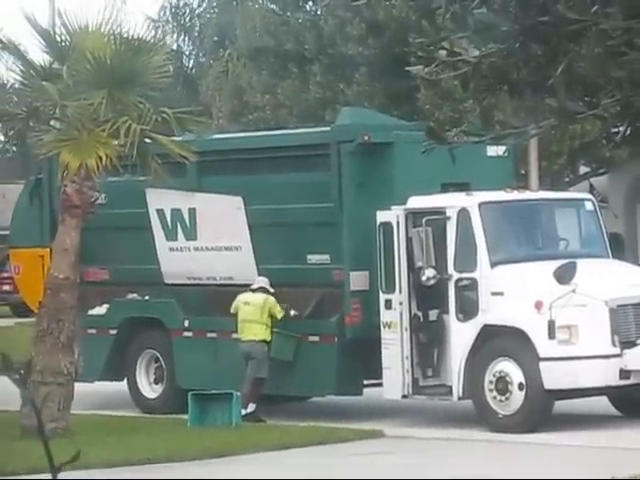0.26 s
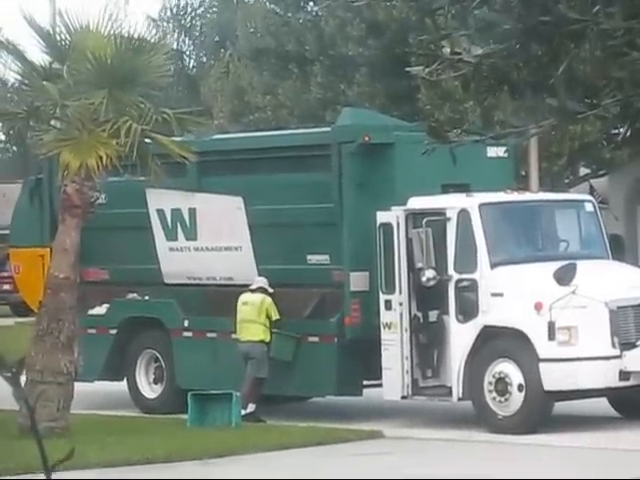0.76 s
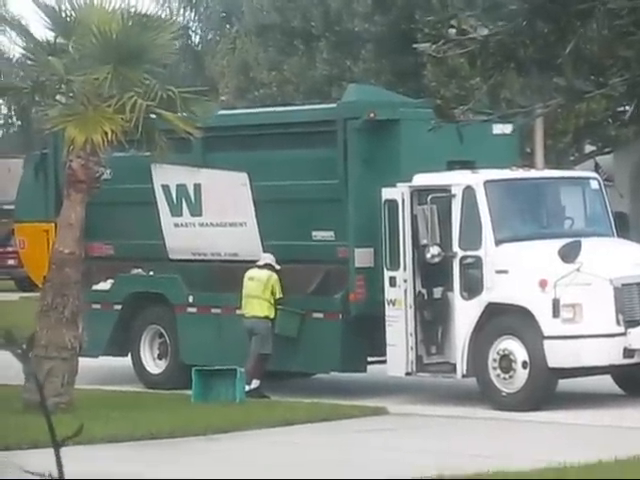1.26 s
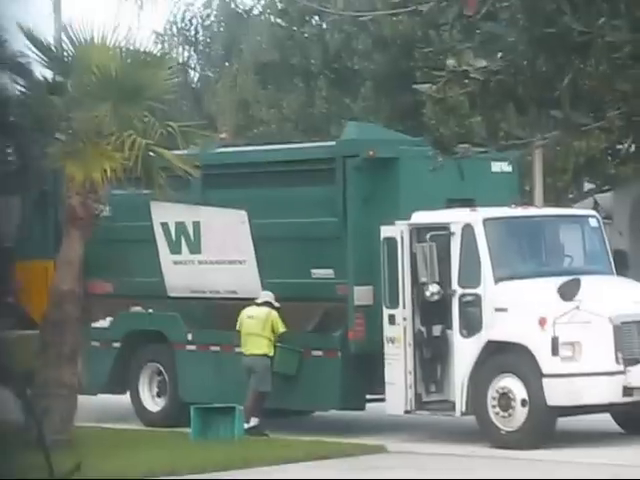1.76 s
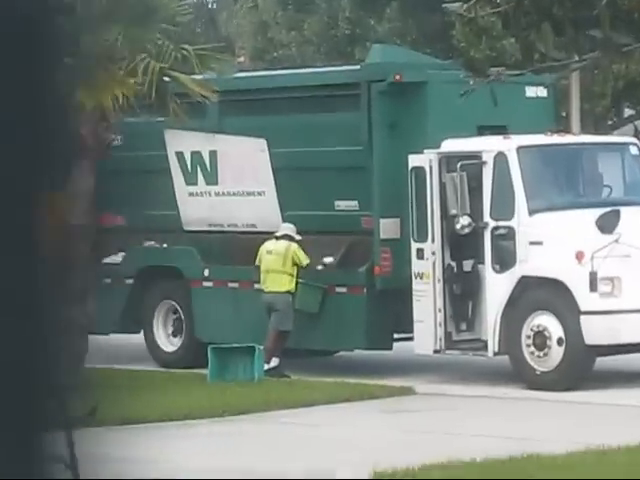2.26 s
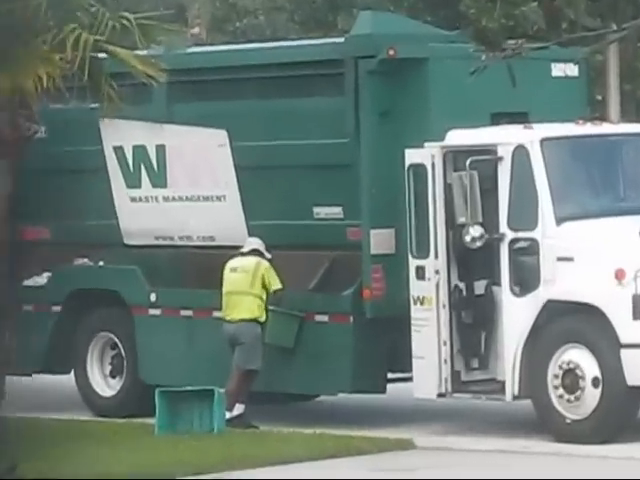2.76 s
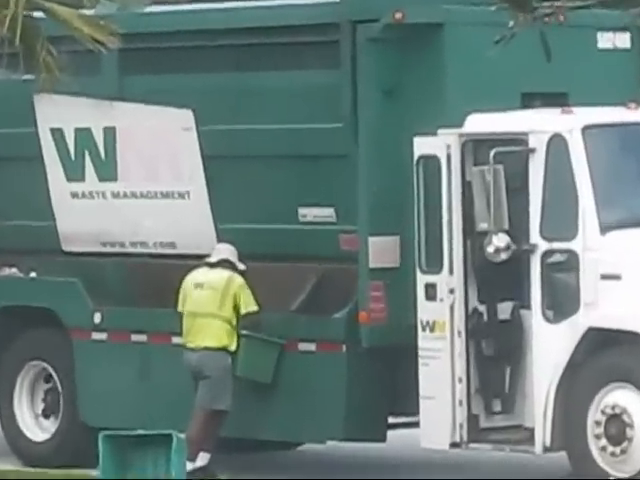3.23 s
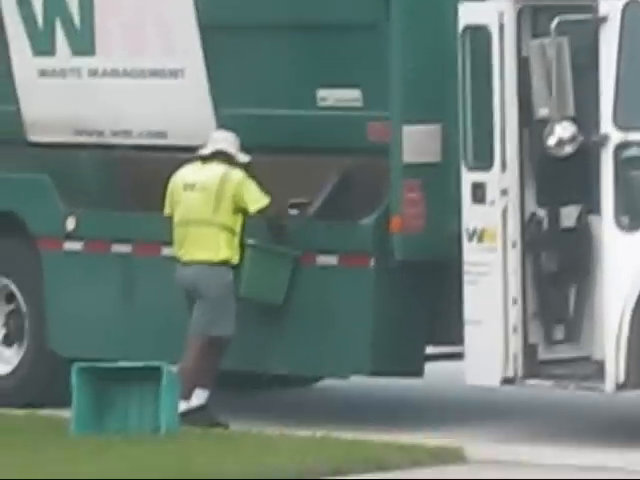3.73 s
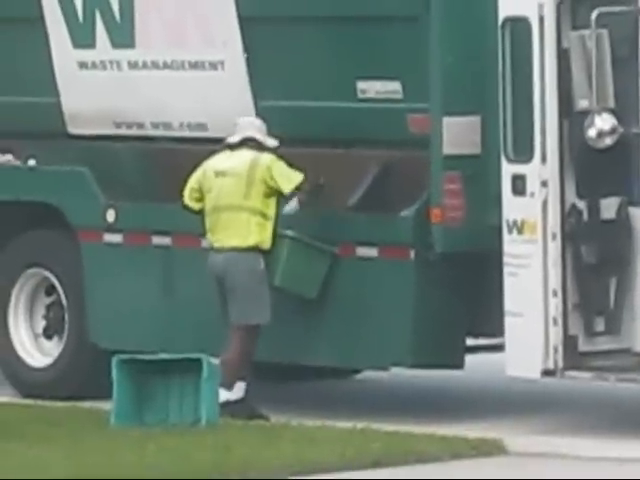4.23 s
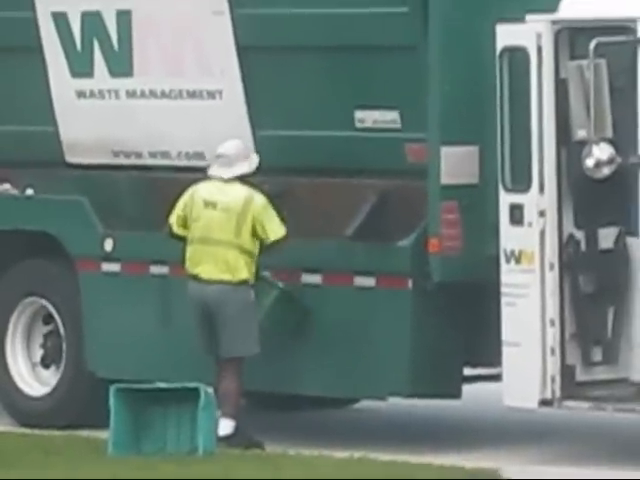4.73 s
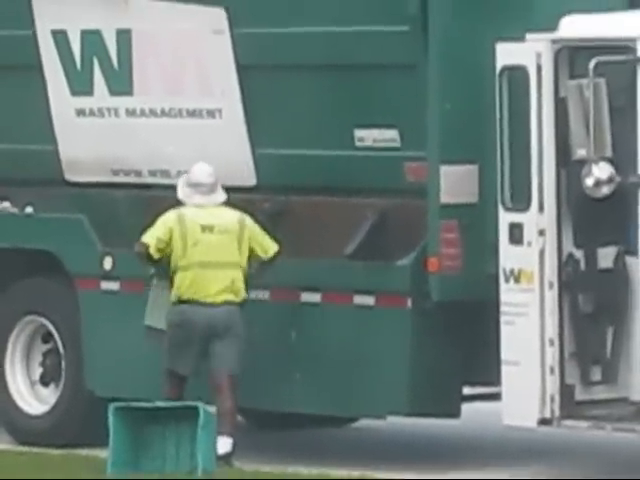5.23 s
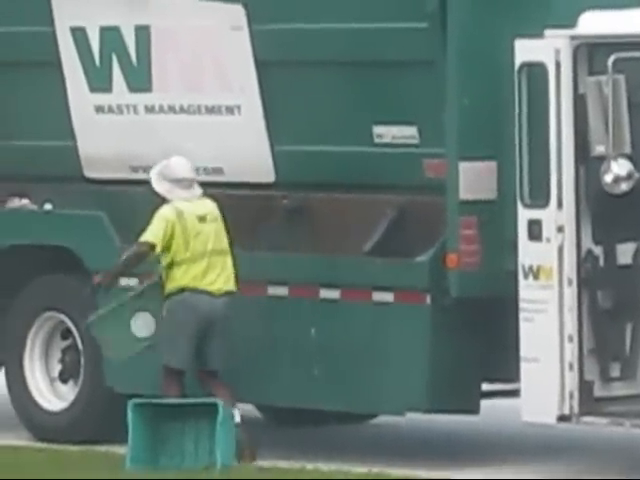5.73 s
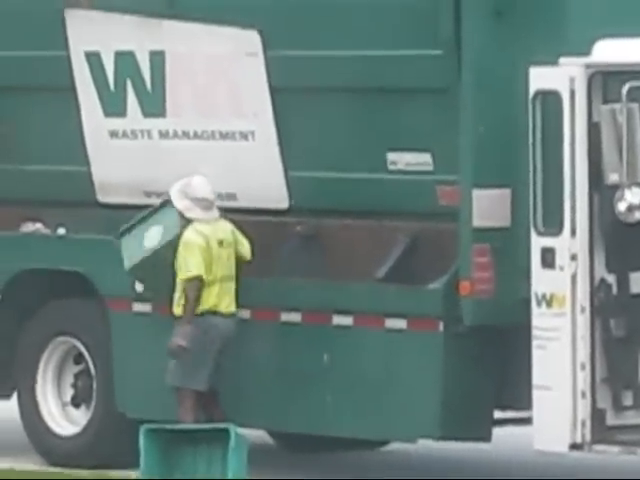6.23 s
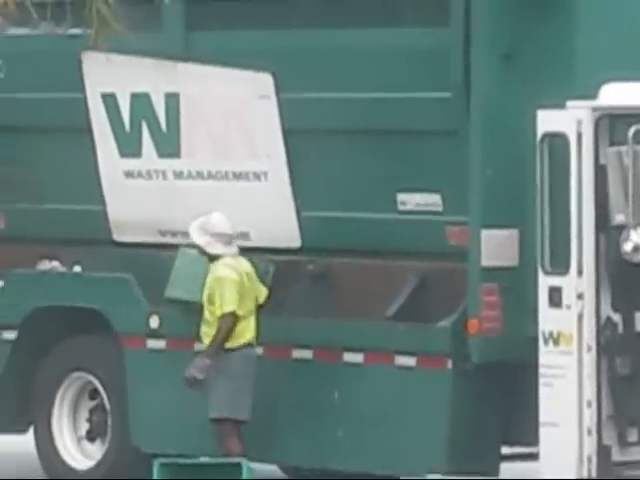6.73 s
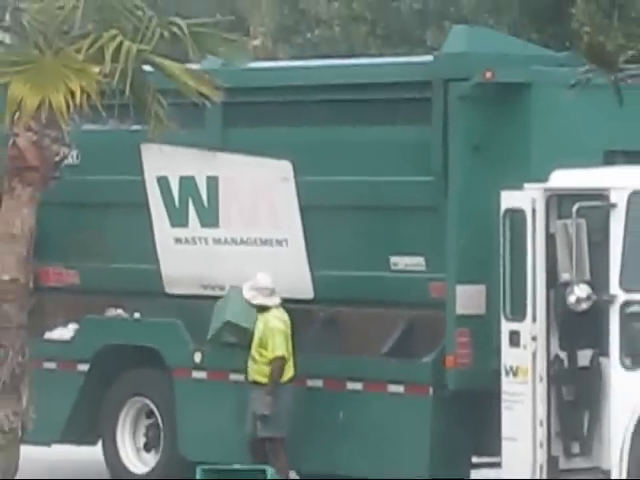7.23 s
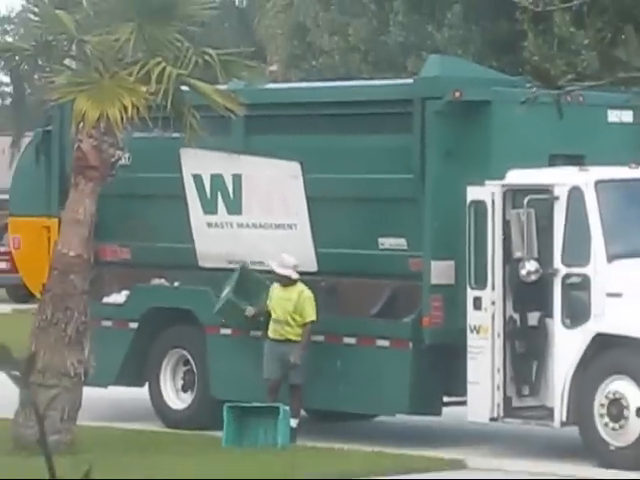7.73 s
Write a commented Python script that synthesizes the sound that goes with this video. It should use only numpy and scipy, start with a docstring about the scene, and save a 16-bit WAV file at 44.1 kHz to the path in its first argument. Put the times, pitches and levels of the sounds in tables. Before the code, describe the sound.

Outdoors across a residential street, a diesel truck idles steadily with a low throb and faint whine. Batches of glass bottles and cans crash into its steel hopper, ringing brightly over metallic clangs and dull thuds, with sparse echoes off hopper walls and houses. Gaps leave the engine alone. Very close, loud dry plastic clicks from the hand-held recorder interrupt, some overloading. Two lone thin glass clinks come near the end.

```python
"""Handfuls of bottles and cans land in the steel hopper of a diesel truck that idles across the street.
Each piece of glass rings with decaying partials; noise blows ring the steel and rumble the load beneath.
The engine is a firing tone, noise booms and whines, and a throbbing clatter; sparse echoes follow the load.
Close to the microphone, the plastic shell of the hand-held recorder clicks in short bursts of modes and noise."""
import sys
import numpy as np
from scipy import signal
from scipy.fft import rfft, irfft, next_fast_len
from scipy.io import wavfile
from scipy.ndimage import uniform_filter1d

SR = 44100
rng = np.random.default_rng(int(sys.argv[2]) if len(sys.argv) > 2 else 0)


def transcribe(u):
    """Save the signal u as a 16-bit wav file named by the first command-line argument.

    u: samples, shape (n,) or (channels, n), limited to [-1, 1]; the rate is SR.
    q: integer samples, one column per channel.
    """
    v = np.clip(np.atleast_2d(u).T, -1, 1)
    q = np.round(v * 32767).astype(np.int16)
    wavfile.write(sys.argv[1], SR, q)


N = 352182  # samples, just under 8 s

# hopper steel between its modes: (f/Hz, level/dB per Hz)
WALL = [(250, -23.5), (500, -6), (900, 3), (2000, 5), (2600, -3), (3600, -17.5), (4500, -19), (7000, -12.5)]


def gain_of(db):
    """Amplitude factor of a level in dB."""
    return 10 ** (np.asarray(db) / 20)


def evened(x):
    """Scales x to rms 1."""
    return x / np.sqrt(np.mean(abs(x) ** 2) + 1e-20)


def add(mix, s, sound):
    """Lays a sound into the mix, starting at s seconds."""
    part = mix[round(s * SR):][:len(sound)]
    part += sound[:len(part)]


def coloured(x, points):
    """Filters x by a curve of (f/Hz, level/dB) points on a log frequency axis; rms 1."""
    f, db = np.transpose(points)
    size = next_fast_len(len(x))
    hz = np.fft.rfftfreq(size, 1 / SR)
    curve_db = np.interp(np.log(hz + 1), np.log(f), db, -90, -90)
    return evened(irfft(rfft(x, size) * gain_of(curve_db), size)[:len(x)])


def resonate(x, hz, width):
    """One two-pole resonance, its width in Hz; rms 1."""
    r = np.exp(-np.pi * width / SR)
    return evened(signal.lfilter([1, 0, -r], [1, -2 * r * np.cos(2 * np.pi * hz / SR), r * r], x))


def drift(n, seconds):
    """Slow chance: noise averaged twice over the given time; rms 1."""
    size = max(round(seconds * SR), 2)
    once = uniform_filter1d(rng.standard_normal(n), size)
    return evened(uniform_filter1d(once, size))


def engine():
    """Idling diesel: firing tone with its octave, fuzzy booms and whines, clatter throbbing with the firings."""
    # pipe and cab booms: (f/Hz, width/Hz, level/dB)
    booms = [(124.2, 12.4, -50.5), (187, 20, -53.5), (232.8, 21, -55)]
    # block and pump whines: (f/Hz, width/Hz, level/dB)
    whines = [(762.3, 22, -57), (942, 9.2, -66), (1021, 16, -54.5), (1251, 23, -54), (1358, 7.5, -54.5),
              (1434, 16, -57), (1497, 15, -53), (1603, 3.5, -63.5), (1778, 12.5, -55.5), (2453, 80, -54)]
    # clatter of engine and street: (f/Hz, level/dB per Hz)
    clatter_curve = [(20, -28), (60, -15), (85, -23), (105, -3), (240, -14.5), (400, -16), (750, -11),
                     (1450, -10.5), (2740, -13.5), (4200, -22.5), (6370, -29), (8500, -37), (13700, -35),
                     (15700, -42), (16100, -60)]
    firing_hz, firing_db, clatter_db = 70.2, -43.8, -40  # mean rate and levels, each wavering below

    firings = np.cumsum(firing_hz + .6 * drift(N, .08)) / SR
    octave = gain_of(-9.0) * np.sin(4 * np.pi * firings + 1.13)
    tone_level = np.sqrt(2) * gain_of(firing_db + 1.1 * drift(N, 0.11))
    tone = tone_level * (np.sin(2 * np.pi * firings) + octave)

    uneven = gain_of(2.4 * rng.standard_normal(N // 400))[firings.astype(int)]  # no two firings are alike
    throb = 1 + .5 * uneven * np.exp(-(firings % 1) / 0.52)
    clatter = coloured(throb * rng.standard_normal(N), clatter_curve) * gain_of(clatter_db)
    clatter = clatter * gain_of(.8 * drift(N, .07))  # it wavers a little

    noise = rng.standard_normal(N)
    hum = sum(gain_of(db) * resonate(resonate(noise, f, width), f, width) for f, width, db in booms + whines)
    return tone + clatter + hum


def knock(db, build, piece):
    """A crack at first touch; partials swell as the piece bounces, then die; longer bounces waver more."""
    # partials heard with each piece of glass, with faint high ones above 8 kHz, by name:
    # (f/Hz, level/dB, t60/s)
    glass = { "jar": [(2470, -12, 0.14), (2574, 0.5, 0.14), (2700, -6, .15), (2800, -9, .1),
             (3110, -8, .06), (3680, -15, .15), (4170, -15, .07), (5800, -16, .2)],
             "wine bottle": [(2498, 0, .32), (2440, -6, .3), (3413, 2, .2), (3251, -10, .2),
             (3704, -12, .28), (3984, -9, .3), (4651, -3, .3), (4712, -6, .22), (5227, -16, .3),
             (6228, -17, .35), (6966, -18, .25), (8969, -30, .3), (10570, -28, .3)],
             "green bottle": [(2348, -4, .3), (2390, -8, .2), (2018, -12, .1), (2580, -13, 0.18),
             (4730, -12, .05), (5600, -12, .05)], "flask": [(3138, 0, .35), (6411, -11, .4)],
             "small bottle": [(3466, 0, .25), (3552, -10, .2), (2578, -6, .2), (4139, -12, .2),
             (4650, -12, .2), (5614, -9, .25), (6955, -14, .2)], "beer bottle": [(2379, 0, .18),
             (2455, -6, .22), (3984, -22, .2), (4910, -24, .2), (5943, -12, .33), (6433, -23, .3),
             (8950, -33, .25), (12300, -36, .3), (13620, -34, .5)], "wide jar": [(3316, 0, .22),
             (3407, -1, .22), (4139, -10, .2), (4543, -10, .25), (4750, -12, .15), (5657, -14, .25),
             (11500, -24, .2), (12500, -26, .2)], "juice bottle": [(2455, 0, .35), (2530, -7, .3),
             (3348, -10, .35), (3682, -16, .3), (3860, -20, .3), (4910, -24, .3), (5082, -14, .25),
             (6686, -22, .25), (9205, -26, .25), (10900, -20, .22)], "square bottle": [(2298, -1, .3),
             (2374, 0, .3), (2492, -1, .3), (3682, -6, .3), (5948, -13, .2), (6093, -13, .25),
             (10060, -22, 1.), (14200, -28, .4)], "tall bottle": [(2462, 0, .23), (2496, -6, .25),
             (3192, -1, .38), (3261, -12, .3), (4861, -20, .3), (5200, -20, .35), (5437, -24, .3),
             (5658, -16, .3), (5739, -21, .3), (6227, -10, .45), (6388, -11, .45)],
             "squat bottle": [(2507, -1.5, 0.25), (2405, -11.5, .3), (2610, -7, .3), (3280, -13, .2)],
             "soda bottle": [(2584, 0, .26), (5615, -32, .15)], "phial": [(3343, 0, .18)],
             "thin bottle": [(3327, 0, 0.17), (4002, -9.5, 0.15), (4800, -8, 0.061), (5580, -1.5, 0.0097),
             (6700, -8, 0.014)]}
    t = np.arange(SR // 2) / SR
    rough = .41 * (1 - np.exp(-(build / .003) ** 2))
    ring = 0
    for hz, partial_db, t60 in glass[piece]:
        wander = drift(len(t), .007) + 1j * drift(len(t), .007)  # in both level and phase
        waver = (1 + rough * wander) / np.sqrt(1 + 2 * rough ** 2)
        ring = ring + gain_of(partial_db - 60 * t / t60) * (waver * np.exp(2j * np.pi * hz * t)).imag
    swelling = 1 - np.exp(-t / build)
    fade = np.minimum(20 * (t[-1] - t), 1)  # over the last 50 ms
    crack = gain_of(-14.5 - 60 * t / 0.046) * coloured(rng.standard_normal(len(t)), WALL)
    on_steel = piece != "thin bottle"  # only pieces that land on the steel crack
    return gain_of(db) * (ring * swelling * fade + on_steel * crack)


def street(x):
    """Sparse echoes of either sign from the hopper walls, road and house fronts."""
    size, t60 = SR // 2, 0.58  # samples, s
    taps = rng.choice([-1., 1.], size) * (rng.random(size) < 2000 / SR)  # some 2000 echoes per second
    first = np.arange(size) > 300  # samples, about 7 ms
    taps = taps * gain_of(-60 * np.arange(size) / SR / t60) * first
    return signal.fftconvolve(x, taps / np.linalg.norm(taps))[:N]


def swell(axis, lingers):
    """Level of one layer: each landing builds up, then dies away; landings add in power."""
    # part of a handful lands or slides: (t/s, build-up/s, t60/s before the layer's lingers factor,
    # blows on steel level/dB, fizz of shards level/dB, jostling glass level/dB)
    landings = [(.336, 0.02, 0.41, -31.5, -46, -56), (0.574, 0.0067, 0.67, -27, -39.5, -55),
                (0.599, 0.019, 0.63, -20, -32, -22), (.660, 0.011, 0.42, -19.5, -25, -22.5),
                (.700, .015, 0.42, -28.5, -40, -35), (.760, .03, 1, -31, -42, -34),
                (.850, .01, 0.54, -33, -42, -29.5), (0.941, 0.0067, 0.75, -33, -31.5, -22.5),
                (.965, 0.019, 0.6, -30, -44, -40), (1.240, 0.019, 0.66, -36.5, -34.5, -36),
                (2.424, 0.013, 1, -33, -53, -58), (2.480, 0.038, 0.55, -33.5, -59, -50),
                (2.535, 0.018, 0.45, -28, -54, -38), (2.648, 0.011, 0.97, -30.5, -32, -26),
                (2.680, 0.014, 0.42, -25.5, -25.5, -28), (2.705, 0.011, 0.46, -24.5, -26.5, -26),
                (2.926, .03, 0.37, -46, -37, -32), (3.918, 0.018, 0.44, -32.5, -46.5, -54),
                (3.978, 0.0093, 0.65, -26.5, -57, -33), (4.040, 0.016, 0.2, -26.5, -65, -55),
                (4.122, 0.027, 0.47, -29.5, -29, -44), (4.170, 0.031, 1, -30.5, -33.5, -22),
                (4.942, 0.011, 0.54, -27, -37.5, -35), (4.974, 0.015, 0.55, -27, -31.5, -21.5),
                (5.020, 0.013, 0.42, -29.5, -28.5, -42), (5.255, 0.0075, .8, -50, -44, -32),
                (5.360, 0.024, 0.4, -35.5, -43, -47), (5.412, 0.0078, .6, -39, -55, -36),
                (5.480, 0.0085, 0.21, -41, -60, -44), (5.555, 0.01, .1, -39, -65, -58)]
    power, t = np.zeros(N), np.arange(SR) / SR
    for row in landings:
        s, build, t60 = row[:3]
        decay = gain_of(row[axis] - 60 * np.maximum(t - build, 0) / (t60 * lingers))
        shape = np.minimum(t / build, 1) * decay
        add(power, s, shape ** 2)
    return np.sqrt(power)


def jostle(n):
    """Many small pieces of glass touch at random; each rings briefly at a pitch of its own."""
    # where the heaped glass rings: (f/Hz, spread to either side/Hz, level/dB)
    heap = [(2470, 150, -0.5), (3315, 320, -5), (4770, 454, -17.5), (5930, 552, -12.5), (10900, 1600, -38)]
    t, out = np.arange(2048) / SR, np.zeros(n)
    for centre_hz, spread_hz, db in heap:
        for pitch, length in rng.random((6, 2)):  # six pieces to a band
            force = gain_of(3 * np.minimum(rng.exponential(1, n), 3))
            touches = force * (rng.random(n) < 60 / SR)  # some 60 per second
            hz = centre_hz + spread_hz * (2 * pitch - 1)
            t60 = .04 + .06 * length
            ring = gain_of(db - 60 * t / t60) * np.sin(2 * np.pi * hz * t)
            out += signal.oaconvolve(touches, ring)[:n]
    return evened(out)


def load():
    """A dense hail of blows rings the steel; the load thuds, shards fizz and the heap jostles."""
    # modes of the hopper: (f/Hz, width/Hz, level/dB)
    hopper = [(650, 53, 3), (753, 40, 4), (966, 15, 2), (986.7, 6.1, 2), (1180, 180, 1), (1320, 42, -0.5),
              (1515, 50, -8), (1855, 30, -1.5), (2000, 44, -12.5)]
    # fizz of shards: (f/Hz, level/dB per Hz)
    shards = [(2500, 16), (3500, 4.5), (6000, 4.5), (7300, -2.5), (9000, -1.5), (11000, -1.5),
              (13000, -6.5), (16000, -9.5)]
    force = gain_of(2.0 * np.minimum(rng.exponential(1, N), 3))
    blows = force * (rng.random(N) < 400 / SR)  # some 400 per second
    hail = evened(signal.lfilter([1], [1, -.99], blows)) + 1.1  # each blow leaves a short wake
    drive = hail * rng.standard_normal(N)

    modes = evened(sum(gain_of(db) * resonate(drive, f, width) for f, width, db in hopper))
    steel = evened(coloured(drive, WALL) + 1.1 * modes)
    thud = gain_of(-10.5) * coloured(drive, [(60, -6), (100, -1), (200, 1.5), (400, -13)])
    fizz = coloured(drive, shards)
    return (swell(axis=3, lingers=0.99) * steel + swell(axis=3, lingers=1.09) * thud
            + swell(axis=4, lingers=0.9) * fizz + swell(axis=5, lingers=0.74) * jostle(N))


def click(db, hz, low_db, crack_db, tick_db):
    """A snap in the plastic: a few cycles of the shell's modes, a broad crack and a bright tick."""
    # low modes of the shell: (f/Hz, level/dB, t60/s)
    shell = [(1477, -0.5, 0.012), (2110, -0.5, 0.0079)]
    t = np.arange(1200) / SR
    noise = rng.standard_normal(len(t))
    ring = gain_of(-60 * t * hz / 18) * np.sin(2 * np.pi * hz * t)  # dies by 60 dB in 18 cycles
    rise = (1 - np.exp(-t / 0.00032)) ** 2  # the snap takes a cycle or two to build
    low = sum(gain_of(low_db + d - 60 * t / t60) * np.sin(2 * np.pi * f * t) for f, d, t60 in shell)
    low = low * (1 - np.exp(-t / 0.00077))
    broad = coloured(noise, [(300, -18), (1200, 3.0), (2200, 4.5), (5200, -1.0), (7500, -14)])
    crack = gain_of(crack_db - 60 * t / 0.0084) * broad
    bright = coloured(noise, [(7500, -15), (8500, 0.5), (14000, -0.5), (16500, -10)])
    tick = gain_of(tick_db - 60 * t / 0.0082) * bright
    return gain_of(db) * rise * (ring + low + crack + tick)


def scene():
    """The truck and its load across the street, with echoes; the clicks and one thin bottle without."""
    # knocks of glass: (t/s, level/dB, time constant of the build-up/s, piece)
    knocks = [(.03, -38.5, 0.0054, "square bottle"), (.19, -28.5, 0.0017, "phial"),
              (0.434, -34, 0.018, "squat bottle"), (0.576, -30, .001, "jar"), (.610, -18, 0.0012, "jar"),
              (0.638, -14, .006, "jar"), (0.668, -17.5, .004, "jar"), (0.699, -34, .004, "jar"),
              (.766, -26, .004, "small bottle"), (0.904, -22, 0.011, "squat bottle"),
              (.945, -16.5, 0.0018, "squat bottle"), (.950, -32, .002, "wine bottle"),
              (0.976, -18.5, 0.0032, "wine bottle"), (1.085, -31, 0.0028, "flask"),
              (1.249, -26, .004, "small bottle"), (1.321, -21.5, 0.005, "green bottle"),
              (2.47, -30, 0.0089, "squat bottle"), (2.54, -38, 0.0037, "small bottle"),
              (2.651, -29, 0.0015, "wide jar"), (2.686, -12.5, 0.0069, "green bottle"),
              (2.689, -19, 0.0063, "wide jar"), (2.715, -18.5, 0.0058, "wide jar"),
              (2.719, -28, .006, "squat bottle"), (2.83, -32, .01, "wide jar"),
              (2.929, -16.5, .002, "beer bottle"), (2.956, -22, 0.005, "beer bottle"),
              (4.131, -24, 0.0033, "squat bottle"), (4.145, -11, 0.014, "juice bottle"),
              (4.165, -19, 0.0086, "juice bottle"), (4.19, -22, .01, "juice bottle"),
              (4.20, -27, .01, "wide jar"), (4.215, -21, 0.0051, "juice bottle"),
              (4.259, -27.5, .005, "square bottle"), (4.31, -34, 0.0081, "square bottle"),
              (4.38, -32.5, 0.0084, "square bottle"), (4.451, -39, 0.011, "square bottle"),
              (4.980, -23, 0.0008, "squat bottle"), (4.987, -15, 0.0046, "tall bottle"),
              (5.03, -16.5, 0.0064, "tall bottle"), (5.050, -23.5, 0.0078, "tall bottle"),
              (5.10, -20.5, 0.0045, "squat bottle"), (5.142, -23, 0.0054, "squat bottle"),
              (5.262, -12.5, .0012, "soda bottle"), (5.354, -41, .004, "soda bottle"),
              (5.415, -21, 0.00048, "squat bottle"), (5.48, -33, .005, "squat bottle"),
              (6.3157, -18.5, 0.00035, "thin bottle"), (6.9696, -22, 0.0004, "thin bottle")]
    # clicks of the shell: (t/s, level/dB, ring f/Hz, then against that level:
    # low modes level/dB, broad crack level/dB, bright tick level/dB)
    clicks = [(0.784, 0.5, 3100, -15, -20, -33), (0.8131, 8, 2760, -10.5, -8.5, -21),
              (.8300, 2, 3030, -19, -5, -22), (.8345, -0.5, 2400, -10, -5.5, -34),
              (1.4604, -3.5, 2770, -6, -15, -31), (1.4622, 3, 2840, -8, -7.5, -29),
              (1.4645, -1.5, 2770, -7, -21, -35), (1.6076, -13.5, 2200, -11, -1, -14),
              (1.6651, -25, 2880, -6, -4, -6), (1.9913, -10.5, 2820, -17, -2.5, -17.5),
              (2.1043, -9, 2500, -6.5, -5.5, -18), (2.2080, -18, 3150, -11, -1.5, -16),
              (3.1800, -40.5, 3000, -19, -19, 3), (3.248, -21, 3180, -9, -10, -26),
              (3.2709, 6, 2860, -15.5, -18.5, -37), (3.4118, -0.3, 2960, -21, 2.5, -6),
              (3.4178, -11.5, 3070, -16, -21, -35), (3.9180, -31.5, 2580, -11, -9, -24),
              (5.201, 9, 2460, -34, -11, -24.5), (5.204, 1, 2920, -17, -22, -37),
              (5.4667, 1.5, 2460, -10, -10, -40), (5.472, -1, 2400, -4.5, -12, -28.5),
              (5.5928, -17, 3260, -9, -16, -30), (5.6356, -16.5, 2700, 2.5, -4, -37),
              (5.7210, -1.2, 2420, -5.5, -14, -28.5), (5.8250, -31, 3000, -11, -3, -11),
              (6.4148, -16, 3200, -15, -11, -22), (6.6260, -23, 2470, -9, -11, -19),
              (6.7674, -29, 2290, -11, -1, -11), (7.9365, -7, 2900, -4.5, -13.5, -28)]
    far, near = load(), np.zeros(N)
    for s, db, build, piece in knocks:
        # the thin bottle rings in the open, outside the hopper
        place = near if piece == "thin bottle" else far
        add(place, s, knock(db, build, piece))
    for s, *how in clicks:
        add(near, s, click(*how))
    return (engine() + far + gain_of(-10.5) * street(far) + near)[None]


def record(dry):
    """The sound has a deep, narrow gap near 8 kHz; loud clicks overload; then the band limit."""
    gap_hz, half_width_hz, edge_hz = 7930, 340, 16600
    band = [gap_hz - half_width_hz, gap_hz + half_width_hz]
    gap = signal.butter(3, band, "bandstop", fs=SR, output="sos")
    clipped = np.clip(signal.sosfilt(gap, dry), -1, 1)
    band_limit = signal.firwin(511, edge_hz, window=("kaiser", 11), fs=SR)
    return signal.oaconvolve(clipped, band_limit[None], "same")


dry = scene()
out = record(dry)
transcribe(out)
```